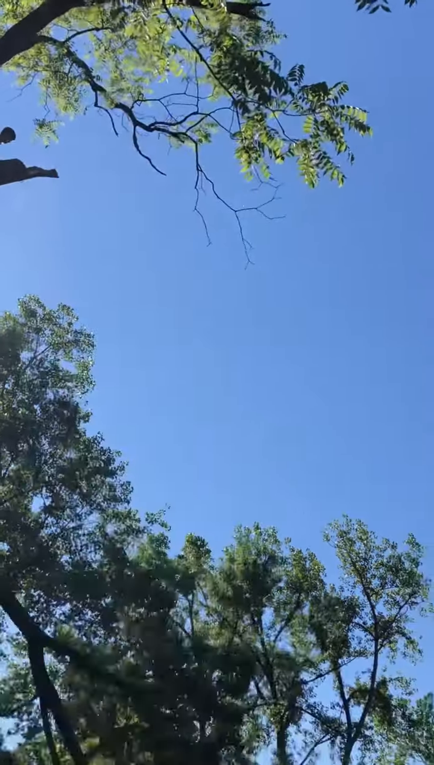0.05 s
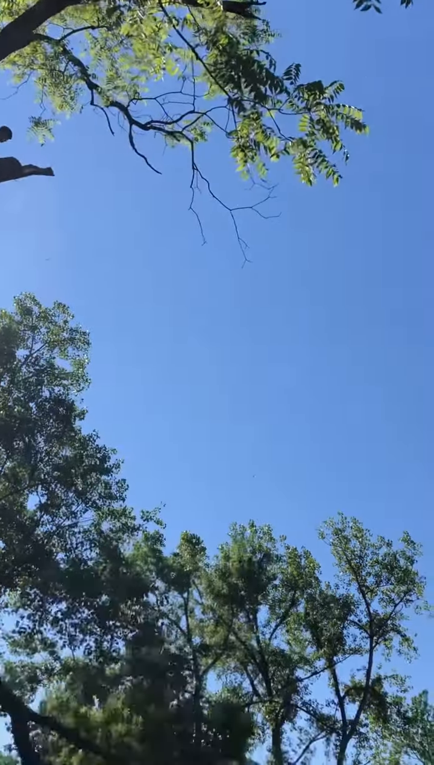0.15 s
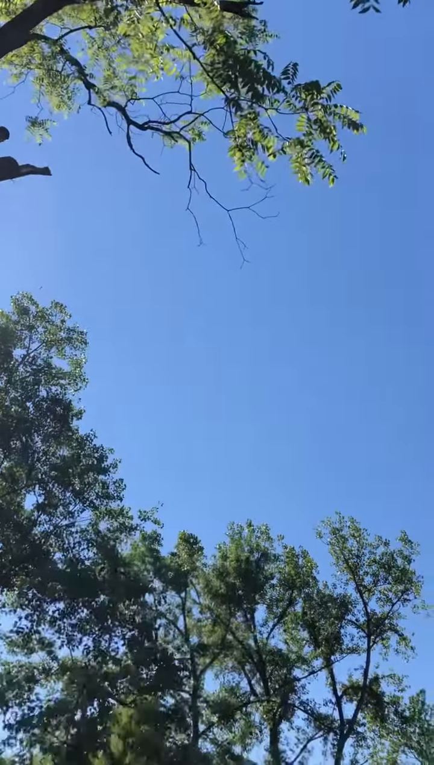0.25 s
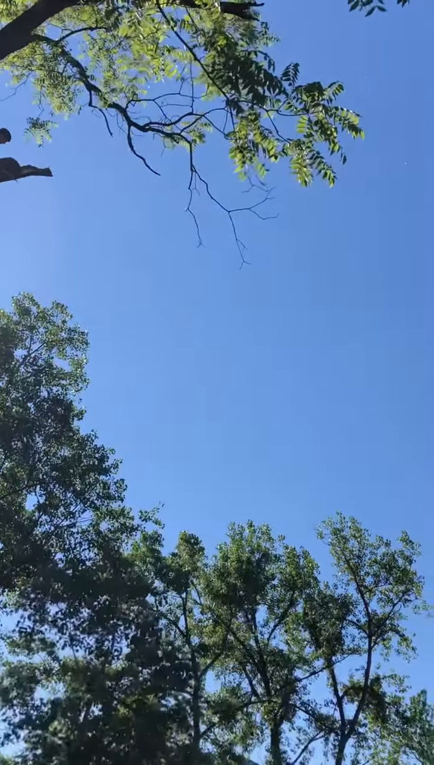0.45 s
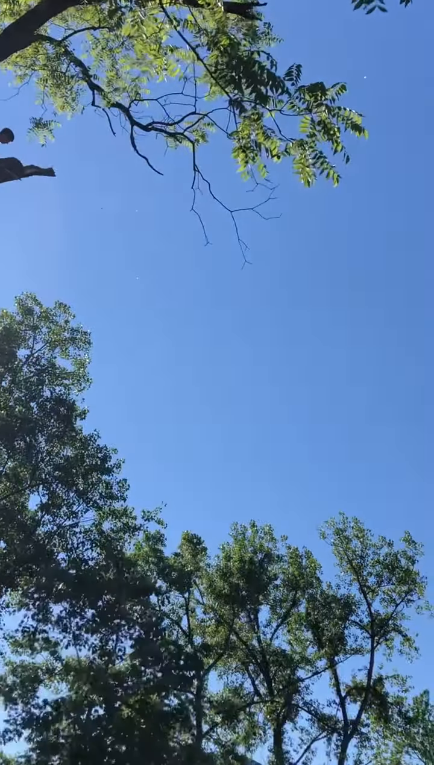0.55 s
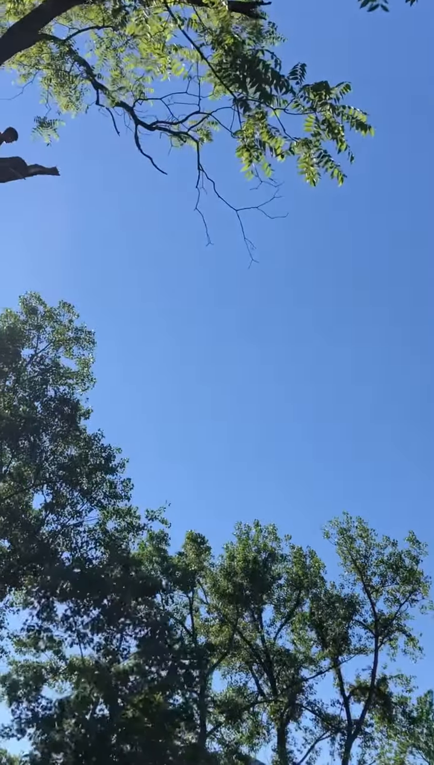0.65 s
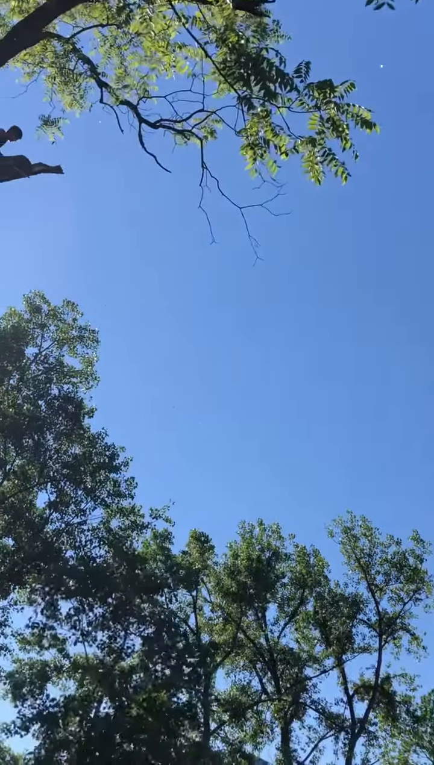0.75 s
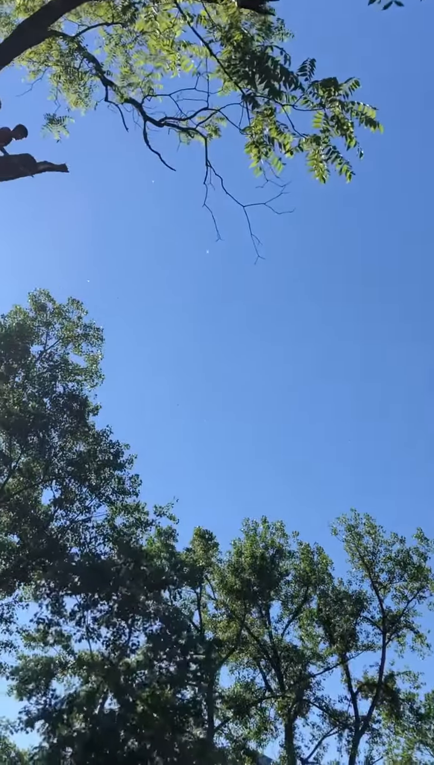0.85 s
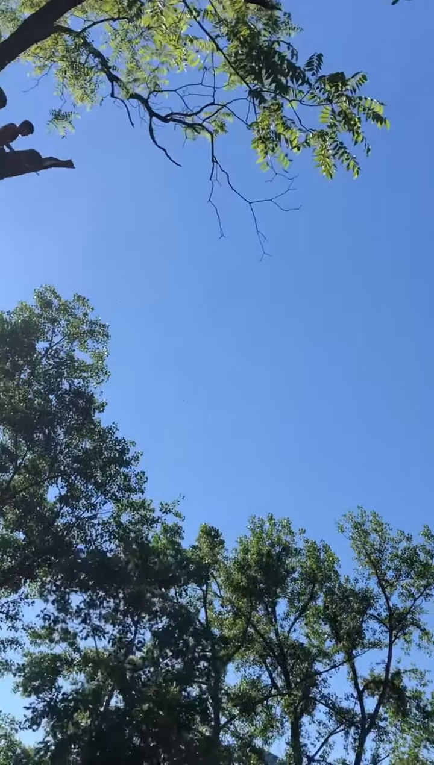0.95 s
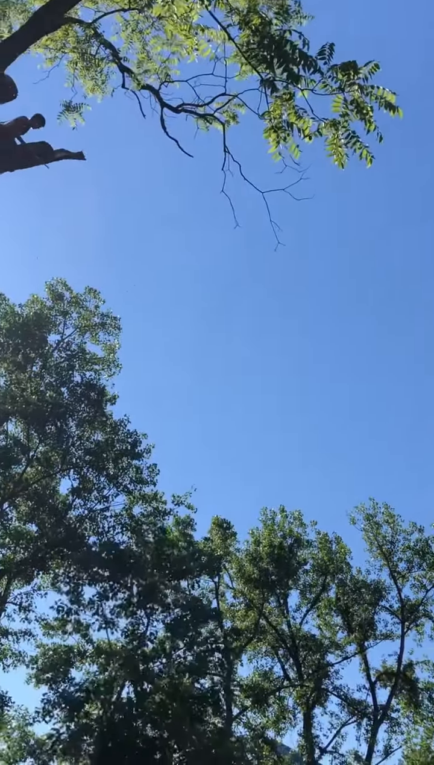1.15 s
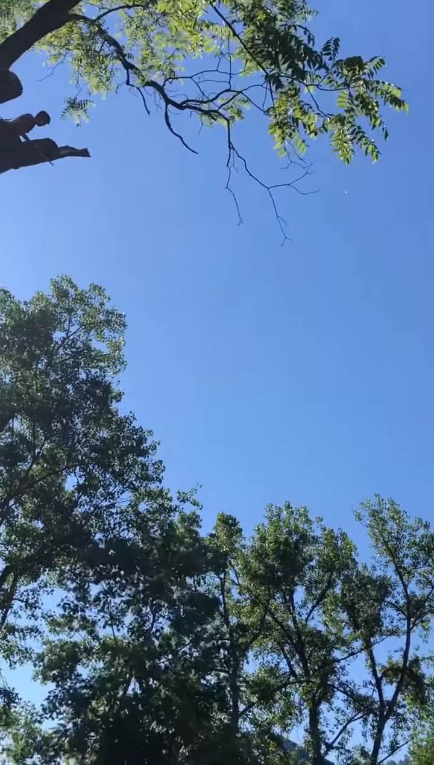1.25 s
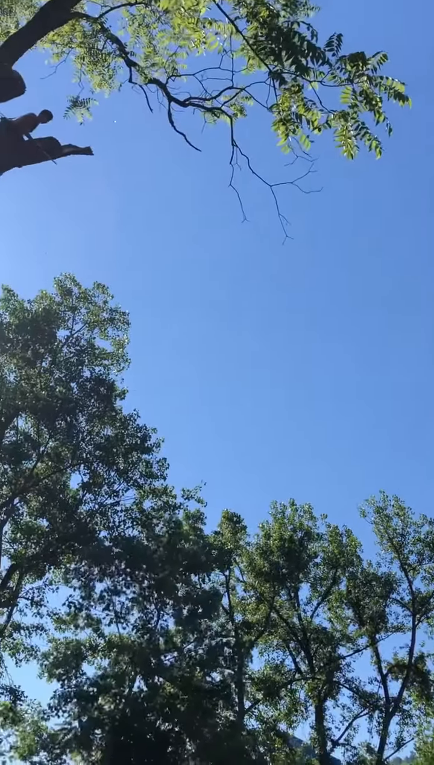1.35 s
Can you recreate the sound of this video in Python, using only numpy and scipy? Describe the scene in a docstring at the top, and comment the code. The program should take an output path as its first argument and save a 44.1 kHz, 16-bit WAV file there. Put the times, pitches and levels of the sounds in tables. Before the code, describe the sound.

Leaves rustle and twigs crack as a tree branch comes down in a wood.

```python
"""In a wood, a leafy branch comes down. Thousands of leaves tick together in a rush; twigs crunch
and snap with a crack, a ring and splinters. Boughs knock in damped modes and the limb lands with
dull, leaf-cushioned thuds. The foliage settles and the trees scatter a dying echo. Behind it:
a distant idling engine, the rumble of air stirred by the boughs, and faint outdoor air."""
import sys
import numpy as np
from scipy import signal
from scipy.io import wavfile

SR = 44100
rng = np.random.default_rng(int(sys.argv[2]) if len(sys.argv) > 2 else 0)


def wav_out(sig):
    """Save sig, one row per channel (or a flat mono array), as 16-bit PCM at SR to the path in sys.argv[1]."""
    wavfile.write(sys.argv[1], SR, np.round(np.clip(np.atleast_2d(sig).T, -1, 1) * 32767).astype(np.int16))


N = 61739
T = np.arange(N) / SR

# Rush of the leaves. Each row: time in seconds, level in dB.
LEAF_LEVEL_DB = [(0, -36.5), (.09, -35), (.115, -30.5), (.16, -34.5), (.23, -28.5), (.35, -21.5),
                 (.4, -25.5), (.43, -22), (.45, -15.5), (.505, -22.5), (.53, -17), (.578, -26), (.61, -19),
                 (.68, -18), (.77, -27.5), (.86, -33), (1.05, -43.5), (1.4, -53.5)]
# Leaf spectrum. Each row: frequency in Hz, relative density in dB.
LEAF_SPECTRUM_DB = [(200, -13.5), (500, -5.5), (1000, -8.5), (2000, -3), (3400, 0), (5000, -4),
                    (8000, -6.5), (9200, -11), (12000, -13), (15500, -19)]
# Crunch of twigs pressed together. Each row: time in seconds, level in dB.
CRUNCH_LEVEL_DB = [(0, -44), (.22, -39.5), (.27, -31.5), (.355, -23), (.395, -28), (.44, -25), (.49, -27.5),
                   (.57, -25), (.615, -19), (.675, -22.5), (.697, -37), (.725, -20.5), (.77, -36),
                   (.87, -48.5), (1.4, -55)]
# Crunch spectrum. Each row: frequency in Hz, relative density in dB.
CRUNCH_SPECTRUM_DB = [(100, -13), (200, 0), (330, -2.5), (500, -7.5), (750, -1), (1300, 0.5), (2000, -2),
                      (3500, -19), (8000, -20.5)]
# Breaking twigs. Each row: start in seconds, snap level in dB, ring in Hz, splinter level in dB,
# bottom and top of the crack and splinter band in Hz.
TWIG_SNAPS = [(.109, -21, 3360, -33, 1500, 6800), (0.2533, -10, 3270, -14.5, 495, 5500),
              (.297, -10, 3240, -19.5, 1330, 5050), (.312, -14, 2450, -35, 1000, 5050),
              (0.346, -12.5, 2850, -17, 700, 3980), (.410, -7.5, 730, -14, 450, 1500),
              (0.4129, 0.5, 4200, -13, 800, 5500), (.424, 2.5, 2890, -47, 1490, 5550),
              (0.441, -9, 3600, -25.5, 1500, 8450), (0.4593, -1, 3600, -21, 1200, 5500),
              (0.469, -6, 3170, -18, 1190, 5900), (0.519, -7.5, 3600, -14, 1090, 5770),
              (0.553, -5, 3000, -40, 1000, 6100), (.591, 2.5, 2080, -17, 1010, 3020),
              (.610, -1, 1449, -13.5, 900, 11000), (.621, 0.5, 1970, -26, 900, 5700),
              (0.6298, -4, 3100, -11.5, 1000, 5740), (0.657, -7, 3930, -34, 1000, 6050),
              (0.675, -6, 1420, -33, 800, 4500), (0.708, -15, 1850, -16, 1000, 3800),
              (.7245, -6.5, 1195, -21, 550, 3000), (0.7475, -9.5, 2560, -28, 800, 5000)]
# Knocking boughs. Each row: start in seconds, gain in dB, lowest mode in Hz, rise in seconds,
# contact low-pass in Hz, ring time as a multiple of the modes' T60.
BOUGH_KNOCKS = [(.322, -43, 280, 0.012, 400, 1.2), (.355, -4, 283, 0.0064, 328, 1.1),
                (0.4074, -1.5, 339.6, 0.0047, 1600, .6), (0.4346, -15, 315, 0.0029, 1500, 1.15),
                (0.724, -22, 345, .002, 1400, .7)]
# Bough modes. Each row: ratio to the lowest mode, gain in dB, base T60 in seconds.
BOUGH_MODES = [(1, -2.5, 0.053), (1.17, -13, 0.086), (2.23, 0.5, 0.038), (3.01, 5, 0.032), (3.5, 1.5, .035),
               (4.75, -20, 0.01)]
# Limb hitting the ground. Each row: start in seconds, level in dB, first and last pitch in Hz,
# length in seconds.
LIMB_THUDS = [(.657, -11, 364.3, 70.5, 0.01985), (0.66, -13, 128.5, 74, .024), (0.686, -24, 58, 50, 0.036),
              (.700, -24, 433, 387, .022), (.706, -22, 288.5, 130, 0.0315)]
# Engine idle. Each row: time in seconds, cycle rate in Hz, gain in dB.
ENGINE_IDLE = [(0, 18, -1), (.45, 16.8, -1.5), (.85, 17.25, 1.5), (1.4, 17.8, 4)]
# Engine orders. Each row: multiple of the cycle rate, base level in dB.
ENGINE_ORDERS_DB = [(3, -55.5), (5, -48.5), (6, -51), (8, -44), (9, -39), (10, -46.5), (11, -45), (17, -59),
                    (18, -63)]
# Air pushed by swinging boughs. Each row: time in seconds, level in dB.
BREEZE_LEVEL_DB = [(0, -47), (.25, -45.5), (.42, -56), (.62, -45), (.72, -43), (.84, -40), (.95, -62),
                   (1.4, -65)]
# Outdoor air spectrum. Each row: frequency in Hz, relative density in dB.
AIR_SPECTRUM_DB = [(60, -23), (120, 1), (220, -9.5), (300, -3), (450, -14.5), (680, -9), (1100, -20),
                   (3000, -19.5), (12000, -41)]


def from_db(db):
    """Decibels to gain."""
    return 10 ** (np.asarray(db) / 20)


def unit_rms(x):
    """Scale to rms 1."""
    return x / np.sqrt(np.mean(x ** 2) + 1e-20)


def curves(rows):
    """Columns of a time table, interpolated per sample."""
    times_s, *columns = np.transpose(rows)
    return [np.interp(T, times_s, column) for column in columns]


def filtered(x, hz, kind, order=2):
    """Butterworth filter."""
    return signal.sosfilt(signal.butter(order, hz, kind, fs=SR, output="sos"), x + 1e-18)


def drift(rate_hz):
    """Slow random wander, rms 1."""
    hop, warmup = 40, 2000
    pole = np.exp(-2 * np.pi * hop * rate_hz / SR)
    noise = rng.standard_normal(N // hop + warmup + 2)
    slow = signal.lfilter([1], [1, -2 * pole, pole * pole], noise)[warmup:]
    return np.interp(np.arange(N) / hop, np.arange(len(slow)), unit_rms(slow))


def decay(start_s, t60_s):
    """Envelope falling 60 dB in t60_s from start_s."""
    return (T >= start_s) * np.exp(-np.log(1000) * np.maximum(T - start_s, 0) / t60_s)


def clicks(per_s, spread_db):
    """Random clicks of uneven size, rms 1."""
    sizes = from_db(spread_db * np.minimum(rng.exponential(1, N), 3.5))
    signs = rng.choice([-1, 1], N)
    return unit_rms(sizes * signs * (rng.random(N) < per_s / SR))


def crackle(per_s, smooth_share, spread_db):
    """Near clicks over the smooth sum of many far ones."""
    near = np.sqrt(1 - smooth_share) * clicks(per_s, spread_db)
    return near + np.sqrt(smooth_share) * rng.standard_normal(N)


def coloured(sources, spectrum, flicker_db, flicker_hz):
    """Third-octave bands fed alternately by two sources, each flickering on its own; rms 1."""
    points_hz, points_db = np.transpose(spectrum)
    edges_hz = 31.25 * 2 ** (np.arange(28) / 3)
    out = 0
    for k, (low_hz, high_hz) in enumerate(zip(edges_hz, edges_hz[1:])):
        centre_hz = np.sqrt(low_hz * high_hz)
        if centre_hz > points_hz[0] / 2:
            db = np.interp(np.log(centre_hz), np.log(points_hz), points_db)
            band = filtered(sources[k % 2], [low_hz, high_hz], "band")
            out += from_db(db + flicker_db * drift(flicker_hz)) * band
    return unit_rms(out)


def leaf_rush():
    """Leaves tick against each other as the branch sweeps down and settles."""
    level_db, = curves(LEAF_LEVEL_DB)
    ticks = [crackle(per_s=5900, smooth_share=0.54, spread_db=4.5) for _ in range(2)]
    return from_db(level_db) * coloured(ticks, LEAF_SPECTRUM_DB, flicker_db=1.7, flicker_hz=40)


def twig_crunch():
    """Twigs scrape and crunch, lower and coarser than the leaves."""
    level_db, = curves(CRUNCH_LEVEL_DB)
    ticks = [crackle(per_s=1500, smooth_share=0.29, spread_db=3.5) for _ in range(2)]
    return from_db(level_db) * coloured(ticks, CRUNCH_SPECTRUM_DB, flicker_db=2.5, flicker_hz=16.6)


def twig_snaps(ring_cycles=12.8, crack_gain=0.27):
    """Each break: a crack, a few cycles of ringing, a dying spray of splinters."""
    out = 0
    for start_s, snap_db, ring_hz, splinter_db, *band_hz in TWIG_SNAPS:
        ring = decay(start_s, ring_cycles / ring_hz) * np.sin(2 * np.pi * ring_hz * (T - start_s))
        noise = unit_rms(filtered(rng.standard_normal(N), band_hz, "band"))
        crack = crack_gain * decay(start_s, t60_s=0.005) * noise
        spray = unit_rms(filtered(clicks(per_s=6000, spread_db=2.5), band_hz, "band"))
        splinters = decay(start_s, t60_s=0.046) * spray
        out += from_db(snap_db) * (ring + crack) + from_db(splinter_db) * splinters
    return filtered(out, hz=380, kind="high")


def bough_knocks():
    """Boughs of different lengths ring briefly; soft contacts wake only the low modes."""
    out = 0
    for start_s, db, lowest_hz, rise_s, contact_hz, t60_scale in BOUGH_KNOCKS:
        age_s = T - start_s
        ring = 0
        for k, (ratio, mode_db, t60_s) in enumerate(BOUGH_MODES):
            mode = (-1) ** k * np.sin(2 * np.pi * lowest_hz * ratio * age_s)
            ring += from_db(mode_db) * decay(start_s, t60_scale * t60_s) * mode
        attack = np.clip(age_s / rise_s, 0, 1) ** 2
        out += from_db(db) * filtered(attack * ring, contact_hz, "low")
    return filtered(out, hz=234, kind="high", order=4)


def limb_thuds():
    """Cushioned by leaves, each landing is a few soft swings that sink in pitch."""
    out = 0
    for start_s, db, first_hz, last_hz, length_s in LIMB_THUDS:
        progress = np.clip((T - start_s) / length_s, 0, 1)
        cycles = length_s * (first_hz * progress + (last_hz - first_hz) * progress ** 2 / 2)
        out += from_db(db) * np.sin(np.pi * progress) ** 2 * np.sin(2 * np.pi * cycles)
    return out


def tree_echo(x, gain_db=-15.5):
    """Trunks and crowns scatter a dull, dying echo."""
    scatter = filtered(rng.standard_normal(N), hz=7000, kind="low", order=1)
    response = scatter * decay(start_s=0.022, t60_s=0.75)
    response /= np.sqrt(np.sum(response ** 2))
    return from_db(gain_db) * signal.fftconvolve(x, response)[:N]


def engine(waver_db=0.7):
    """Low orders of a distant idle beat together once a cycle."""
    rate_hz, gain_db = curves(ENGINE_IDLE)
    cycles = np.cumsum(rate_hz) / SR
    out = 0
    for order, base_db in ENGINE_ORDERS_DB:
        level_db = base_db + gain_db + waver_db * drift(rate_hz=7.6)
        out += from_db(level_db) * np.sin(2 * np.pi * (order * cycles + rng.random()))
    return out


def breeze():
    """Air stirred by the boughs rumbles on the microphone."""
    level_db, = curves(BREEZE_LEVEL_DB)
    rumble = filtered(rng.standard_normal(N), hz=(38, 115), kind="band", order=3)
    return from_db(level_db) * unit_rms(rumble)


def outdoor_air(level_db=-45):
    """Faint, low noise with slowly wavering bands."""
    noise = rng.standard_normal((2, N))
    return from_db(level_db) * coloured(noise, AIR_SPECTRUM_DB, flicker_db=1.5, flicker_hz=3.6)


def scene():
    """Falling branch over engine and air, mono; only twigs and boughs echo."""
    wood = twig_crunch() + twig_snaps() + bough_knocks()
    air = outdoor_air()
    branch = leaf_rush() + wood + tree_echo(wood) + limb_thuds()
    return (branch + engine() + breeze() + air)[None]


def record(dry, ceiling=0.9, cutoff_hz=15700):
    """The microphone drops the deepest bass, rounds the peaks and cuts the top."""
    x = filtered(dry, hz=34, kind="high", order=3)
    rounded = x / (1 + (x / ceiling) ** 6) ** (1 / 6)
    return signal.sosfilt(signal.ellip(14, 0.1, 90, cutoff_hz, fs=SR, output="sos"), rounded)


dry = scene()
out = record(dry)
wav_out(out)
```